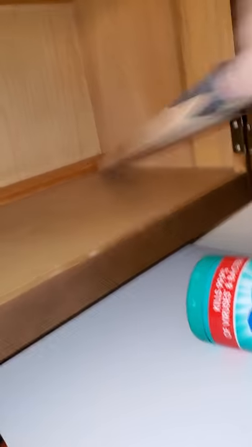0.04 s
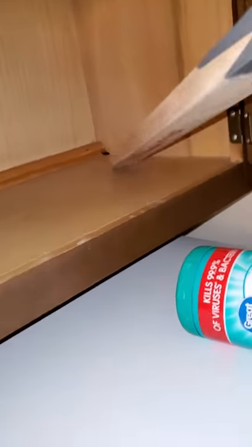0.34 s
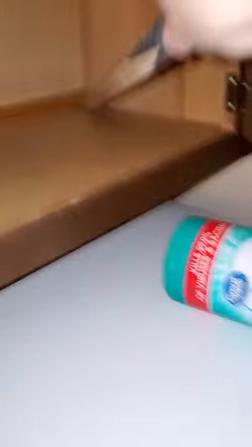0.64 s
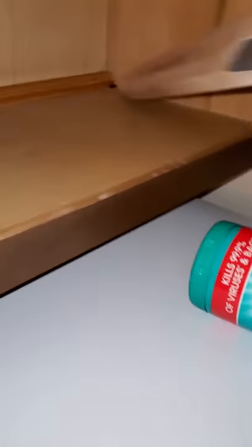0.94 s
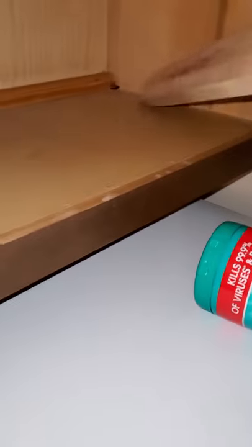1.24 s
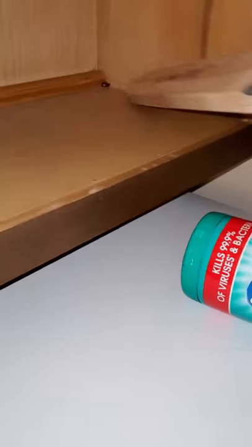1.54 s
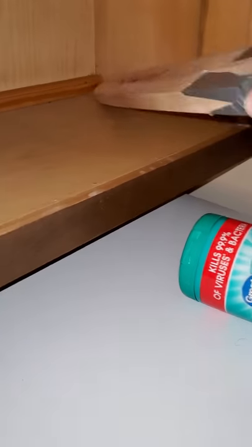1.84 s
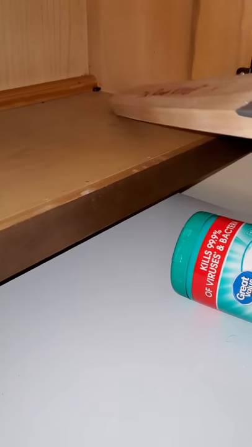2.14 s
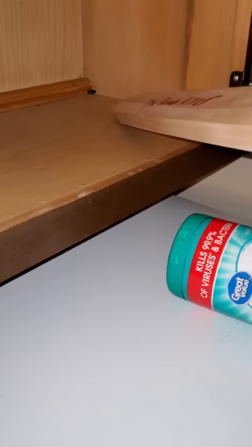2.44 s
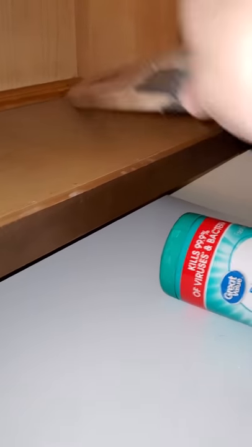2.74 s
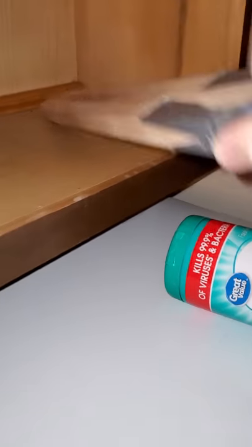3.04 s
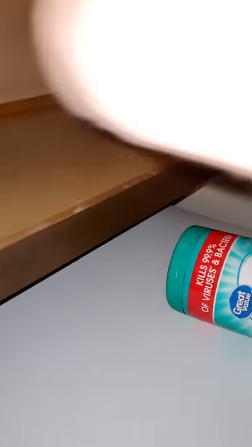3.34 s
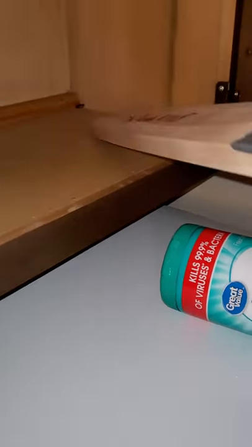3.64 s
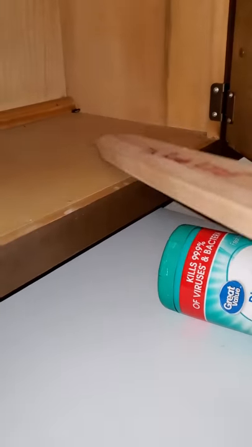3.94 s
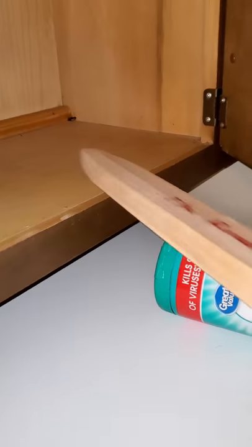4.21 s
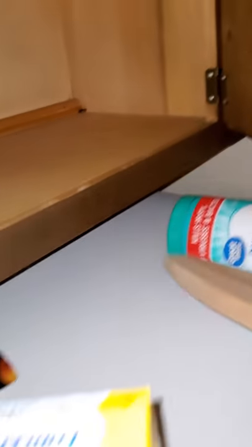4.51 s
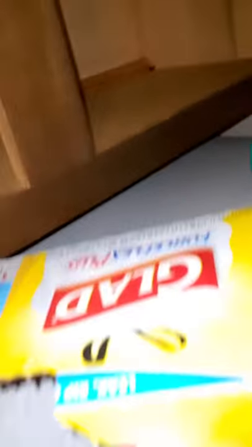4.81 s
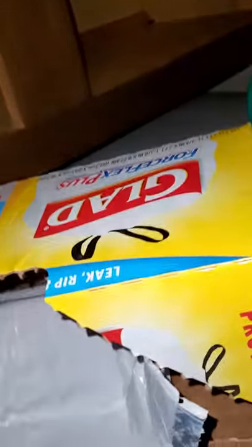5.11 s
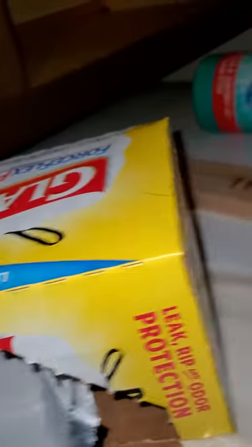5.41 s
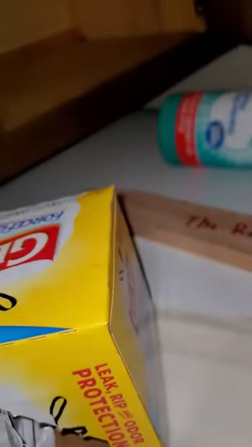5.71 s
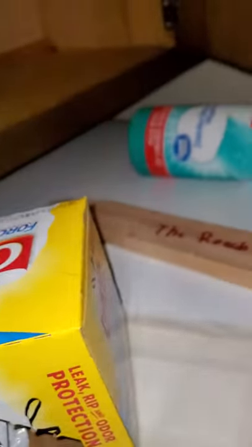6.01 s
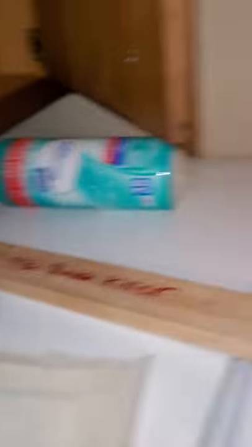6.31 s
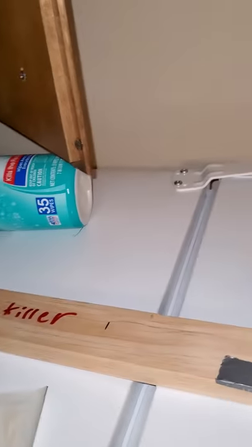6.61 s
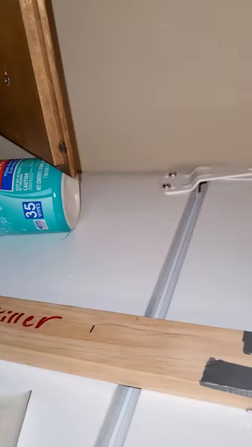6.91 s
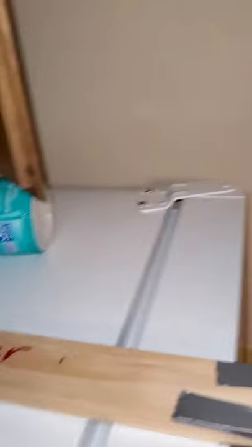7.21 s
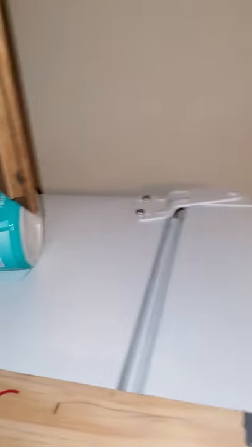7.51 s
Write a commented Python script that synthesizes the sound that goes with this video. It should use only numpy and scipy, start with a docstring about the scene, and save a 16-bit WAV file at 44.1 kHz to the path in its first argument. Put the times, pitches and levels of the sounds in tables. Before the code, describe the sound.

A flat wooden paddle scrapes along a kitchen cabinet shelf and slaps down nine times in two bursts, each sharp smack making the cabinet boom. After a brief lull, a hollow cardboard box is knocked and rocks to rest. The paddle rasps past it with one faint squeak, followed by small ticks and a low, growing appliance hum. Everything is close, with a short room echo.

```python
"""A flat wooden paddle scrapes along a kitchen cabinet shelf and is slapped down nine times, close by.
Often its edge lands first with a thud, then the face smacks, and the cabinet booms a moment later.
A hollow cardboard box is knocked and rocks to rest; the paddle rasps past it and squeaks once.
Small things tick, and a low appliance hum grows at the end. Nearby boards and the room echo it all."""
import sys
import numpy as np
from scipy import signal
from scipy.fft import rfft, irfft
from scipy.io import wavfile

SR = 44100
rng = np.random.default_rng(int(sys.argv[2]) if len(sys.argv) > 2 else 0)


def dump_mix(stems):
    """Bounce the given channels to the path in sys.argv[1] as a 16-bit WAV at rate SR."""
    frames = np.atleast_2d(stems).T  # one column per channel
    limited = np.clip(frames, -1, 1)  # hard clip at full scale
    pcm = np.round(limited * 32767).astype(np.int16)
    wavfile.write(sys.argv[1], SR, pcm)


N = 332955
TIME = np.arange(N) / SR
AGE = np.arange(SR) / SR  # seconds since a blow

# Shelf and paddle ringing together. Each row: pitch in Hz, level in dB, t60 in seconds.
WOOD_MODES = [(244, -4.5, 0.28), (288, -1.5, 0.31), (350.3, 2.5, 0.2), (386, -1.5, .12),
              (544.2, -2.5, 0.13), (615, -2, 0.066), (654.4, -7.5, 0.41), (726, -4.5, 0.092),
              (784, -3, 0.18), (825, -6, 0.14), (910, -15.5, 0.16), (992.5, -2, .14), (1014, -3, 0.16),
              (1170, -11.5, .16), (1218, -8.5, .22), (1317, -4, .2), (1403, -4, .2), (1532, -4.5, 0.16),
              (1598, -8, 0.21), (1758, -7.5, 0.23), (1910, -6, 0.24), (1950, -8, .15), (2043, -2, .12),
              (2100, 0.5, 0.15), (2186, -1.5, 0.1), (2460, -10, 0.24), (2745, -23, .17), (3000, -13, .2),
              (3490, -11.5, 0.19)]


def paddle_slaps():
    """Each blow cracks on the shelf, bends the paddle and, more slowly, sets the cabinet booming."""
    # Edge and face landings. Each row: start in seconds, smack in dB, contact cutoff in Hz,
    # paddle flex in dB, cabinet boom in dB.
    blows = [(0.1035, -18, 900, -30.5, -45.5), (0.1133, -6.5, 6007, -16.5, -27.5),
             (0.6345, -5.5, 1800, -8.5, -36.5), (0.6575, -6, 6926, -21.5, -15),
             (0.865, -23.5, 500.7, -33.5, -56.5), (1.0245, -5, 7026, -19, -13),
             (1.126, -21.5, 6955, -47.5, -53.5), (1.2955, -15.5, 1176, -17, -46.5),
             (1.305, -12, 891.5, -20.5, -51.5), (1.348, -6, 10550, -31.5, -17.5),
             (1.6915, -23, 993, -17.5, -53), (1.699, -14, 794, -19, -52), (1.7555, -5, 9660, -18.5, -15.5),
             (2.7062, -4.5, 1703, -6, -29), (2.723, -7.5, 10830, -28.5, -20),
             (2.803, -28, 4970, -44.5, -53), (2.951, -7, 8230, -27, -21), (2.9615, -7.5, 10920, -17, -18.5),
             (3.0508, -16.5, 9040, -36.5, -41.5), (3.1222, -9, 7040, -18, -22.5),
             (3.1548, -6.5, 7100, -11.5, -17), (3.2438, -16.5, 9100, -39, -52),
             (3.3128, -14, 3840, -30.5, -24), (3.3555, -7, 6680, -12.5, -17)]
    # The cabinet's dense upper resonances. Each row: frequency in Hz, level in dB.
    wood_spectrum = [(100, -27), (190, -9), (320, -10), (470, -13), (750, -5.5), (1300, -11.5), (2150, -6),
                     (2700, -12), (3600, -13.5), (5000, -21), (8000, -22.5), (9200, -30), (16000, -28)]
    # How long they ring. Each row: frequency in Hz, t60 in seconds.
    wood_decay = [(100, .3), (350, 0.63), (900, 0.46), (2300, .32), (4000, .22), (8000, 0.2),
                  (16000, 0.092)]
    # Air squeezed out between paddle and shelf. Each row: frequency in Hz, level in dB.
    snap_spectrum = [(200, -24), (900, -4.5), (2200, 3.5), (4000, -3.5), (5500, -10.5), (7500, -10),
                     (10000, -20.5), (16000, -17)]
    # The cabinet's big panels. Each row: pitch in Hz, level in dB, t60 in seconds.
    panel_modes = [(49, -6, .3), (66, 5.5, 0.05), (86.4, -4, 0.24), (137.7, -23.5, 0.9)]
    out, rings = np.zeros((2, N)), ring(WOOD_MODES)
    shelf, *spots = [dense(wood_spectrum, wood_decay, crack_t60=0.028, tail_db=-14.5) for _ in range(11)]
    snap = dense(snap_spectrum, wood_decay, crack_t60=0.036, tail_db=-39.5)
    flex = highpass(swell(hz=197.4, t60=0.053, rise=0.0038, crest=.0082), 73)
    boom = sum(amp(db) * swell(hz, t60, rise=0.025, crest=.0232) for hz, db, t60 in panel_modes)
    landing = 1 - np.exp(-AGE / 0.0015)  # the face meets the shelf over a moment, not all at once
    for k, (start, smack_db, cutoff_hz, flex_db, boom_db) in enumerate(blows):
        # each landing spot excites the same cabinet a little differently
        crack = amp(-11) * shelf + amp(-5.5) * spots[k % len(spots)]
        smack = crack + amp(-7.5) * strike(rings, scatter_db=2.5) + amp(-6) * snap
        smack = soften(highpass(smack * landing, 110), cutoff_hz)
        add(out, start, amp(smack_db) * smack + amp(flex_db) * flex + amp(boom_db) * boom)
    return out


def paddle_slides():
    """Wood fibres catch on the shelf and sound its modes; a fast shove turns the rub into a hiss."""
    # Fast shoves that end in a slap. Each row: start in seconds, run-up in seconds, top level in dB.
    shoves = [(-.035, 0.15, -25), (0.544, 0.12, -34.5), (0.939, 0.088, -30), (1.265, 0.082, -37),
              (1.665, .088, -34.5), (2.612, 0.11, -29), (3.27, 0.071, -40.5)]
    # Slow drags over the shelf. Each row: start in seconds, length in seconds, level in dB.
    drags = [(.12, 0.15, -48), (.33, 0.18, -55.5), (.68, 0.19, -43.5), (.86, .12, -45.5), (1.04, 0.44, -47),
             (1.52, .14, -48.5), (1.78, 0.26, -48.5), (2.06, 0.15, -56.5), (2.17, 0.16, -54.5),
             (2.72, .73, -46), (3.46, 0.25, -52.5), (3.7, 0.26, -58), (3.94, 0.095, -51.5)]
    # The body of a slow rub. Each row: frequency in Hz, level in dB.
    slow_spectrum = [(71, -29.5), (120, -2), (188, -19), (295, 1), (513, -14.5), (742, -7.5), (1460, -8),
                     (1750, -8), (2350, -8.5), (2850, -17.5), (3250, -13.5), (3900, -22.5), (7660, -32.5),
                     (9400, -42), (14200, -40), (16000, -51)]
    # The hiss of a fast rub. Each row: frequency in Hz, level in dB.
    fast_spectrum = [(180, -34.5), (300, 0.5), (486, -23), (624, -11.5), (1280, -11), (1430, -15),
                     (1640, 2), (2790, -3), (7950, 0), (9240, -4.5), (16000, -18.5)]
    speed_power = 1.5  # a shove's gain grows as this power of its speed
    shove_stop_s, drag_rise_s = 0.029, 0.066
    shove = sum(amp(db) * stroke(start, run_up, run_up, shove_stop_s * speed_power) ** speed_power
                for start, run_up, db in shoves)
    gain = np.hypot(shove, strokes(drags, drag_rise_s, fade=.04))
    fast_share = gain ** 2 / (gain ** 2 + amp(-41.5) ** 2)
    catches = air(N) * grain(rate_hz=310, depth_db=1)
    slow_rub = amp(-2) * (colour(catches, slow_spectrum) + bowed(WOOD_MODES))
    rub = slow_rub * np.sqrt(1 - fast_share) + colour(catches, fast_spectrum) * fast_share ** 0.53
    # a dragged edge sounds the shelf's long mode, which rings on after it
    shelf_note = amp(-5) * strokes(drags, drag_rise_s, fade=0.12) * bowed([(288, 0, 0.67)])
    return gain * grain(rate_hz=20, depth_db=2) * rub + shelf_note


def box_knocks():
    """A hollow cardboard box takes a knock, bounces and shudders to rest."""
    # Knocks and bounces. Each row: start in seconds, level in dB, contact cutoff in Hz.
    knocks = [(4.6377, -12, 4500), (4.7123, -17.5, 4530), (4.741, -23, 2480), (4.793, -31, 600),
              (4.849, -31.5, 700), (4.869, -30, 890), (4.999, -30, 300), (5.053, -29, 300),
              (5.709, -50, 3040)]
    # Shudders as it rocks. Each row: start in seconds, length in seconds, level in dB.
    shudders = [(4.65, 0.297, -43), (5.0, 0.11, -48.5)]
    # The hollow ring of the box. Each row: pitch in Hz, level in dB, t60 in seconds.
    box_modes = [(137.4, -13, 0.35), (176, -3.5, 0.15), (279.1, 4, 0.28), (324.7, 0, 0.34),
                 (374.4, -0.5, 0.26), (408, -4, 0.33), (561.5, 0, 0.16), (863, -21.5, 0.29)]
    # The dense resonances of its walls. Each row: frequency in Hz, level in dB.
    wall_spectrum = [(60, -19), (130, -11.5), (330, -1), (480, -11.5), (650, -9.5), (1000, -14),
                     (2000, -17.5), (3000, -26.5), (7000, -25), (10000, -26), (16000, -36)]
    out = strokes(shudders, rise=0.041, fade=0.028) * soften(bowed(box_modes), 480)
    rings = ring(box_modes)
    for start, db, cutoff_hz in knocks:
        walls = dense(wall_spectrum, [(200, .34), (2000, .38), (10000, .26)],
                      crack_t60=0.023, tail_db=-9.5)
        knock = amp(-5) * walls + amp(-1.5) * strike(rings, scatter_db=4.5)
        add(out, start, amp(db) * soften(knock, cutoff_hz))
    return highpass(out, 70)


def box_brushes():
    """Wood brushes along cardboard with a grainy rasp, a fine hiss and a faint rumble of the box."""
    # Light passes. Each row: start, swell and fade in seconds, rasp in dB, hiss in dB.
    brushes = [(4.78, 0.038, 0.046, -76, -54.5), (4.915, 0.037, 0.06, -65, -53.5),
               (4.97, .112, 0.032, -57, -45), (5.698, 0.013, .06, -57.5, -51),
               (5.712, 0.04, 0.045, -55.5, -40), (5.78, .085, 0.099, -48.5, -48),
               (5.925, 0.046, 0.037, -72, -45), (6.008, 0.014, .03, -46, -57),
               (7.245, 0.029, .025, -65.5, -69)]
    # The coarse rasp. Each row: frequency in Hz, level in dB.
    rasp_spectrum = [(150, -4.5), (500, -10), (780, -5), (1100, -11.5), (1500, -6.5), (1900, 1),
                     (2500, -12), (4000, -14.5), (8000, -31.5), (10000, -30.5), (16000, -33)]
    # The fine hiss. Each row: frequency in Hz, level in dB.
    hiss_spectrum = [(1500, -17), (3500, -3.5), (7500, 3), (9500, 4.5), (13500, -1.5), (16000, 6.5)]
    rasp = colour(air(N), rasp_spectrum) * grain(rate_hz=110, depth_db=3)
    rumble = amp(-8) * bowed([(142, 0, .2), (380, -5, .1), (780, 1, 0.1)])
    hiss = colour(air(N) * grain(rate_hz=130, depth_db=3), hiss_spectrum)
    rasp_power, hiss_power = sum(np.outer(amp([rasp_db, hiss_db]), stroke(start, rise, rise, fade)) ** 2
                                 for start, rise, fade, rasp_db, hiss_db in brushes)
    return np.sqrt(rasp_power) * (rasp + rumble) + np.sqrt(hiss_power) * hiss


def squeak():
    """The paddle's edge sticks and slips on the cardboard, sagging in pitch as it slows."""
    # The squeak's two tones. Each row: starting pitch in Hz, level in dB, t60 in seconds.
    squeak_modes = [(1882, -2, 0.051), (2110, 0, .06)]
    start_s, swell_s, sag_per_s = 5.795, 0.032, 1.1
    age = np.maximum(TIME - start_s, 0)
    slowing_clock = np.cumsum(np.exp(-sag_per_s * age)) / SR
    gain = amp(-44) * stroke(start_s, swell_s, swell_s, fade=0.049)
    return gain * np.array([np.interp(slowing_clock, TIME, side) for side in bowed(squeak_modes)])


def ticks():
    """Light touches, each a short click or bump with a brief ring at its own pitch."""
    # Small contacts. Each row: start in seconds, level in dB, pitch in Hz.
    touches = [(4.2408, -65.5, 2480), (4.489, -67.5, 2330), (4.5389, -72, 5010), (5.0793, -42.5, 3680),
               (5.967, -44.5, 786), (6.005, -43.5, 3270), (6.023, -60, 1290), (6.076, -47.5, 1400),
               (6.08, -40.5, 160), (6.504, -58, 4070), (6.9915, -46, 9900), (7.131, -64.5, 7260)]
    out = np.zeros((2, N))
    for start, db, hz in touches:
        spectrum = [(hz / 6, -22), (hz / 2, -4), (hz, 0), (hz * 2, -9), (hz * 5, -24), (hz * 15, -55)]
        click = dense(spectrum, [(200, 0.25), (10000, 0.21)], crack_t60=0.027, tail_db=-16.5)
        ping = amp(-8) * unit(ring([(hz, 0, .12)])[0])
        add(out, start, amp(db) * (click + ping))
    return highpass(out, 90)


def board_echoes(x):
    """Flat boards close by throw back the treble and comb it."""
    # Early reflections. Each row: left delay in seconds, right delay in seconds, level in dB.
    echoes = [(.00178, .0026, -13.5), (.00457, 0.0031, -14), (.00703, .0051, -14), (0.011, 0.015, -20)]
    out = x.copy()
    treble = signal.sosfiltfilt(signal.butter(2, 1500, "high", fs=SR, output="sos"), x)
    for left_s, right_s, db in echoes:
        add(out, left_s, amp(db) * treble * [[1], [0]])
        add(out, right_s, amp(db) * treble * [[0], [1]])
    return out


def kitchen_reverb(x):
    """The room answers with a soft, dull tail."""
    spectrum = [(60, 0), (300, -6), (2000, 4.5), (8000, -6), (16000, -12)]
    tail = dense(spectrum, [(100, 0.51), (2000, 0.69), (10000, 0.63)], crack_t60=0.13, tail_db=-7)
    tail *= 1 - np.exp(-AGE / 0.012)
    tail /= np.sqrt(np.sum(tail ** 2) / 2)
    return x + amp(-20) * signal.fftconvolve(x, tail, axes=1)[:, :N]


def appliance_hum():
    """A faint hum wavers in pitch and level and swells at the end."""
    hum_hz, growth_db_per_s = 99.4, 21
    gain = amp(-76.5) + amp(-54.5 - growth_db_per_s * (TIME[-1] - TIME))
    drift = soften(rng.standard_normal(N), 14)
    pitch_hz = hum_hz + 0.5 * drift / drift.std()
    hum = np.sqrt(2) * np.sin(2 * np.pi * np.cumsum(pitch_hz) / SR)
    return gain * hum * grain(rate_hz=12, depth_db=1.5)


def room_tone():
    """Quiet room air, mostly a low rumble."""
    # The colour of the air. Each row: frequency in Hz, level in dB.
    air_spectrum = [(12, -37), (20, -8.5), (101, 1), (163, -31.5), (248, -22), (301, -15), (377, -16),
                    (434, -22), (660, -22.5), (897, -25), (2260, -31), (2910, -36), (16000, -40.5)]
    return amp(-64) * colour(air(N), air_spectrum)


def amp(db):
    """Decibels to gain."""
    return 10 ** (np.asarray(db) / 20)


def lookup(points, hz):
    """Read (Hz, value) points on a log-frequency axis."""
    point_hz, value = np.transpose(points)
    return np.interp(np.log(hz + 1), np.log(point_hz), value)


def colour(x, points):
    """Give noise a spectrum of (Hz, dB) points, at rms 1."""
    y = irfft(rfft(x) * amp(lookup(points, np.fft.rfftfreq(N, 1 / SR))), N)
    return y / y.std()


def soften(x, hz):
    """Low-pass: a softer contact pushes longer and loses the treble."""
    return signal.sosfilt(signal.butter(2, min(hz, .45 * SR), fs=SR, output="sos"), x)


def highpass(x, hz):
    """Small things radiate no deep bass."""
    return signal.sosfilt(signal.butter(2, hz, "high", fs=SR, output="sos"), x)


def unit(x):
    """Scale a ring to the energy of 10 ms at full level."""
    return x / np.sqrt(np.mean(x ** 2) * x.shape[-1] / (SR / 100))


def add(out, start, x):
    """Mix x in at a start time in seconds."""
    i = max(int(start * SR), 0)
    out[:, i:i + x.shape[-1]] += x[..., :N - i]


def air(size, alike_hz=520):
    """Stereo noise: the same on both sides in the bass, unrelated above."""
    mid, side = rfft(rng.standard_normal((2, size)))
    apart = 1 / (1 + (alike_hz / (np.fft.rfftfreq(size, 1 / SR) + 1)) ** 2)
    return irfft(mid * np.sqrt(1 - apart / 2) + np.outer([1, -1], side * np.sqrt(apart / 2)), size)


def dense(spectrum, t60s, crack_t60, tail_db):
    """Countless resonances: a quick crack, then a tail dying band by band along (Hz, seconds) t60s."""
    noise, out = rfft(air(SR)), 0
    octave = np.log2(np.fft.rfftfreq(SR, 1 / SR) + 1)
    for hz in 62.5 * 2 ** np.arange(0, 8.5, .5):
        band = irfft(noise * np.maximum(1 - 2 * np.abs(octave - np.log2(hz)), 0), SR)
        crack_s = crack_t60 * (2000 / hz) ** 0.61  # shortest in the treble
        fade = amp(-60 * AGE / crack_s) + amp(tail_db - 60 * AGE / lookup(t60s, hz))
        out = out + unit(band * fade) * amp(lookup(spectrum, hz)) * np.sqrt(hz)
    return unit(out)


def ring(modes, apart_hz=650):
    """One stereo decay per (Hz, dB, t60) mode; the higher ones reach the two sides out of step."""
    rings = []
    for hz, db, t60 in modes:
        lag = rng.choice([-1, 1]) * min(hz / apart_hz, 1) * np.array([[1], [-1]]) * np.pi / 4
        rings.append(amp(db - 60 * AGE / t60) * np.sin(2 * np.pi * hz * AGE + lag))
    return np.array(rings)


def swell(hz, t60, rise, crest):
    """A heavy mode that takes a while to build up and has a crest at a given delay."""
    build_up = 1 - np.exp(-(AGE / rise) ** 4)
    fade = amp(-60 * np.maximum(AGE - crest, 0) / t60)
    return build_up * fade * np.cos(2 * np.pi * hz * (AGE - crest))


def strike(rings, scatter_db, detune=.022):
    """The landing spot decides how each mode is pushed; hand pressure shifts their pitch a little."""
    weights = rng.choice([-1, 1], len(rings)) * amp(scatter_db * rng.standard_normal(len(rings)))
    clock = AGE * (1 + detune * rng.uniform(-1, 1))
    return unit(np.array([np.interp(clock, AGE, side) for side in np.tensordot(weights, rings, 1)]))


def bowed(modes):
    """(Hz, dB, t60) modes kept ringing by friction, at rms 1."""
    friction = rng.standard_normal((1, N))
    body = strike(ring(modes), scatter_db=4, detune=0)
    y = soften(signal.fftconvolve(friction, body, axes=1)[:, :N], 2600)
    return y / y.std()


def grain(rate_hz, depth_db):
    """A randomly wavering gain, like the uneven grip of a rub; the grip can only get so tight."""
    grip = soften(rng.standard_normal(N), rate_hz)
    gain = amp(depth_db * 2 * np.tanh(grip / grip.std() / 2))
    return gain / np.sqrt(np.mean(gain ** 2))


def stroke(start, rise, length, fade):
    """A movement timed in seconds: it gathers speed, holds until its length is up, then dies away."""
    age = TIME - start
    return np.clip(age / rise, 0, 1) * np.exp(-np.maximum(age - length, 0) / fade)


def strokes(rows, rise, fade):
    """The joint gain of (start, length, dB) movements that share one attack and release."""
    return np.sqrt(sum((amp(db) * stroke(start, rise, length, fade)) ** 2 for start, length, db in rows))


def scene():
    """Everything sounds in the same small kitchen."""
    action = paddle_slaps() + paddle_slides() + box_knocks() + box_brushes() + squeak() + ticks()
    return kitchen_reverb(board_echoes(action)) + appliance_hum() + room_tone()


def record(dry):
    """The microphones colour each side, the loudest peaks are rounded and the top is cut."""
    # The tone both microphones share. Each row: frequency in Hz, gain in dB.
    response = [(15, -23.5), (28, -6.5), (42, 2), (8300, -1), (9000, -8.5), (12000, -0.5), (16000, 0.5)]
    # Their stereo balance. Each row: frequency in Hz, left minus right in dB.
    balance = [(60, 2.7), (250, -0.5), (500, 3), (1000, 1), (2000, -1), (4000, 0.5), (8000, 7.5),
               (12000, 2)]
    ceiling, top_hz = 1.15, 15900
    hz = np.fft.rfftfreq(N, 1 / SR)
    eq_db = lookup(response, hz) + np.outer([1, -1], lookup(balance, hz)) / 2
    coloured = irfft(rfft(dry) * amp(eq_db), N)
    rounded = ceiling * np.tanh(coloured / ceiling)
    return signal.sosfilt(signal.ellip(8, .2, 70, top_hz, fs=SR, output="sos"), rounded)


dry = scene()
out = record(dry)
dump_mix(out)
```